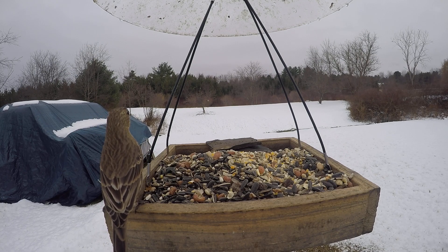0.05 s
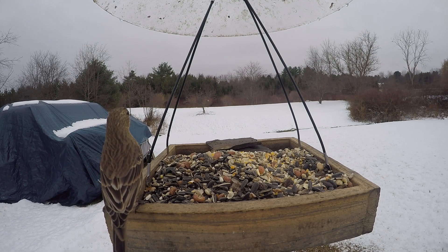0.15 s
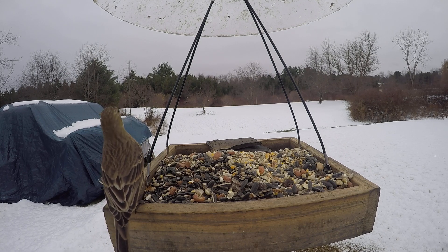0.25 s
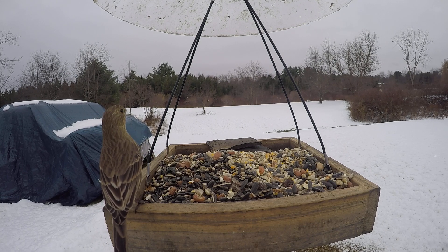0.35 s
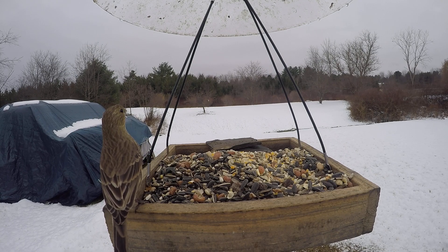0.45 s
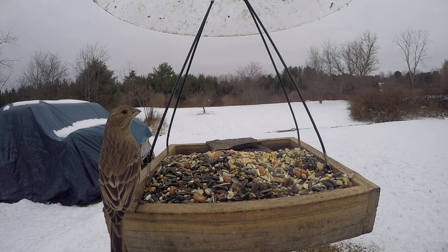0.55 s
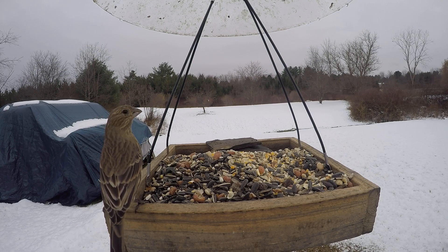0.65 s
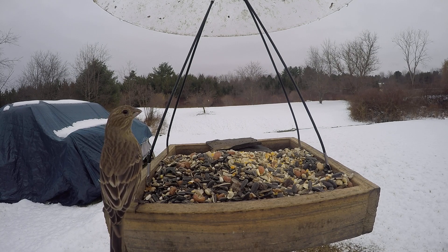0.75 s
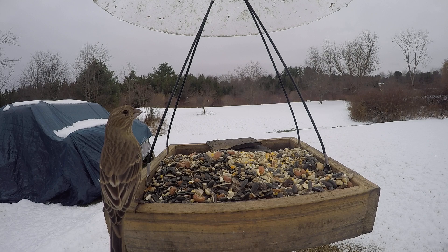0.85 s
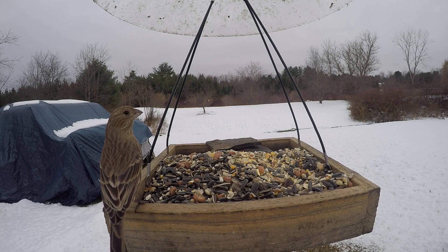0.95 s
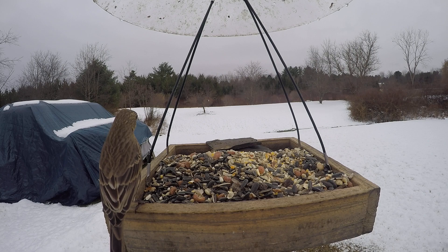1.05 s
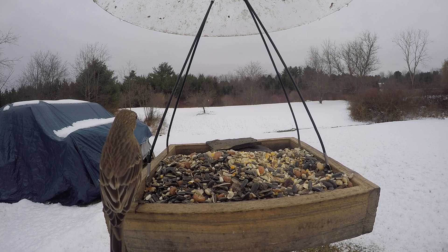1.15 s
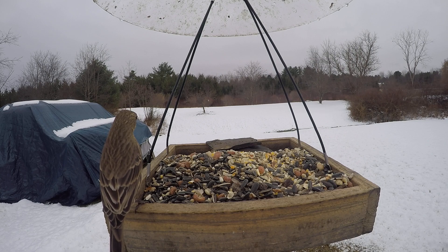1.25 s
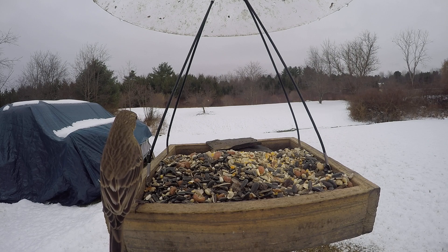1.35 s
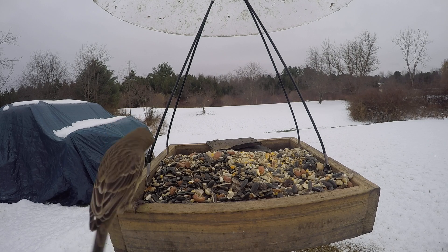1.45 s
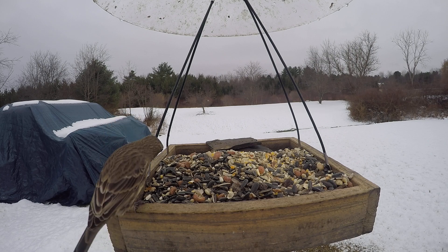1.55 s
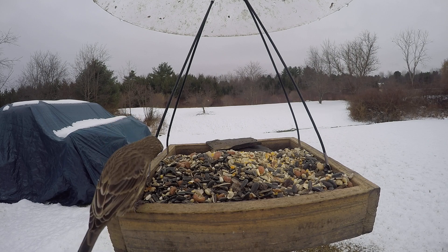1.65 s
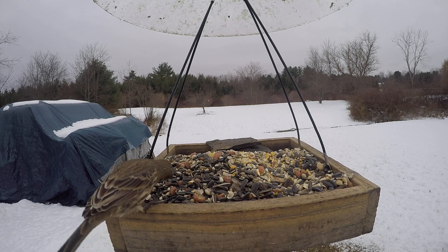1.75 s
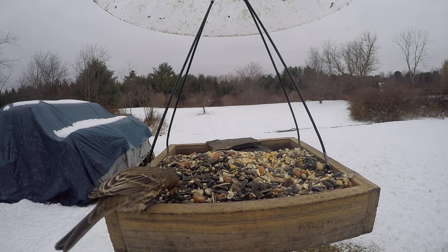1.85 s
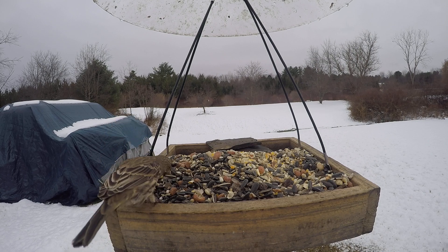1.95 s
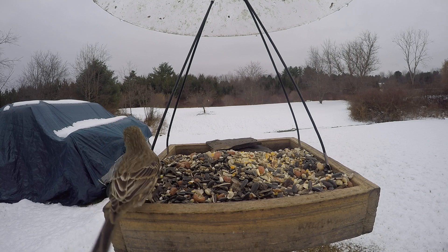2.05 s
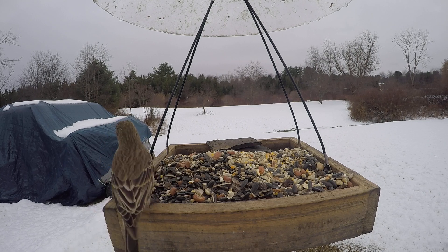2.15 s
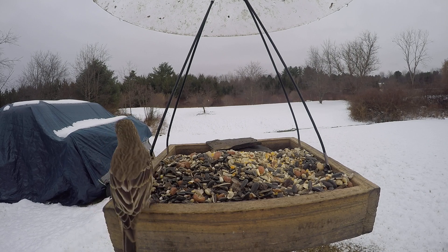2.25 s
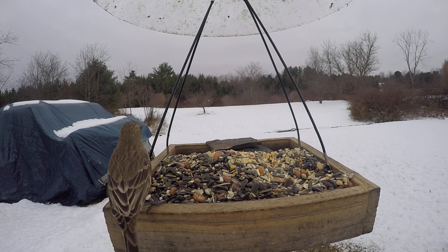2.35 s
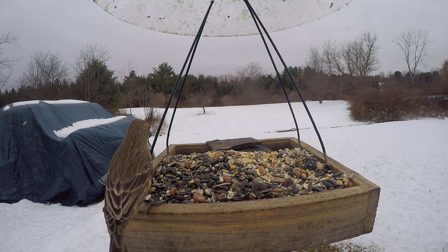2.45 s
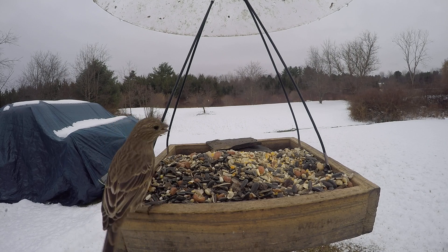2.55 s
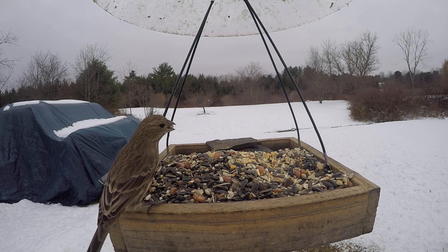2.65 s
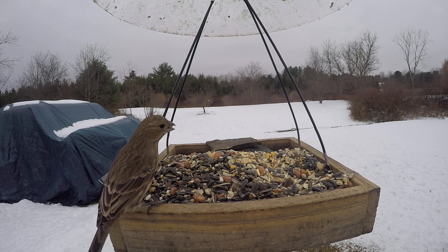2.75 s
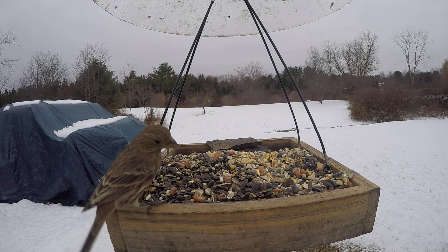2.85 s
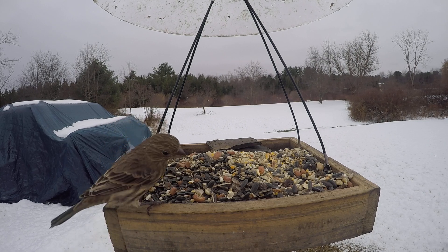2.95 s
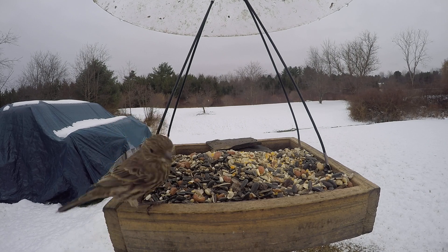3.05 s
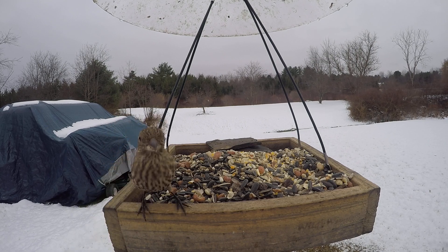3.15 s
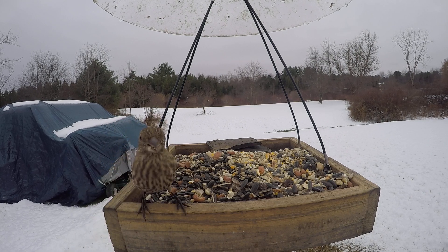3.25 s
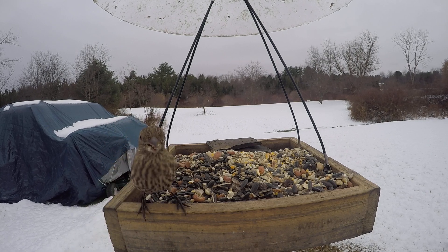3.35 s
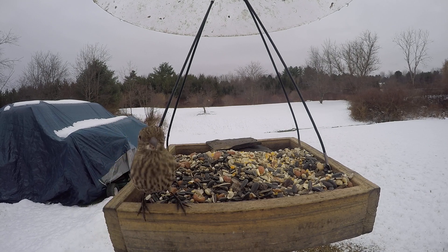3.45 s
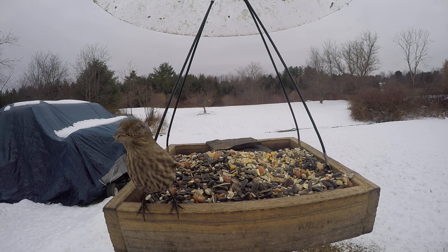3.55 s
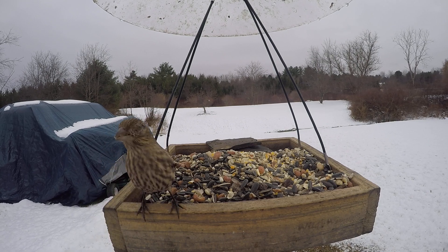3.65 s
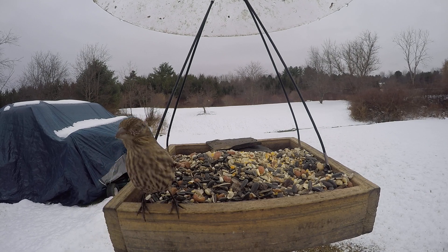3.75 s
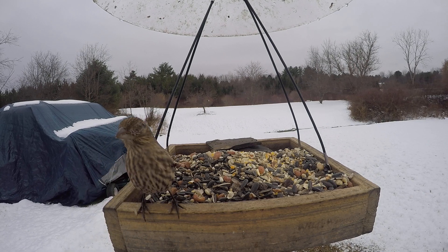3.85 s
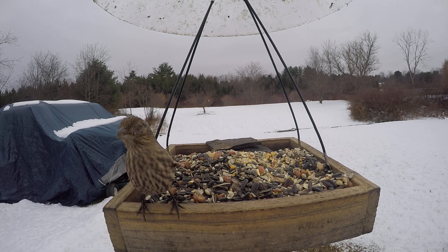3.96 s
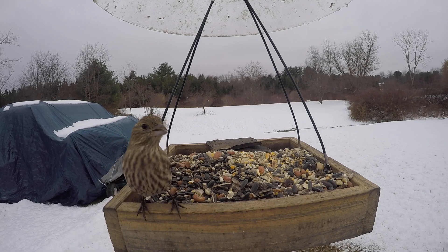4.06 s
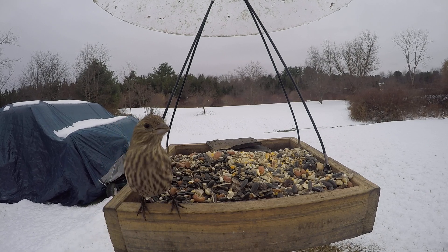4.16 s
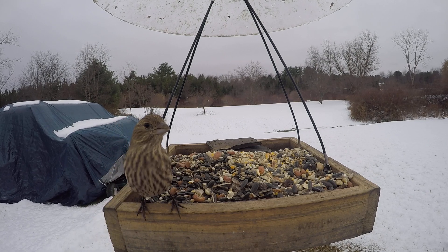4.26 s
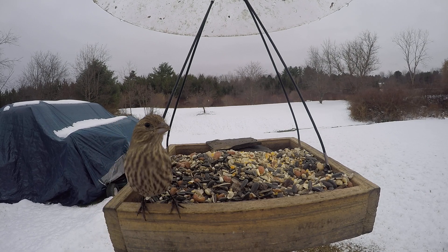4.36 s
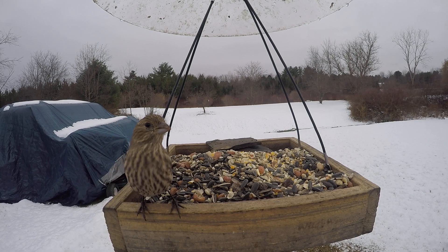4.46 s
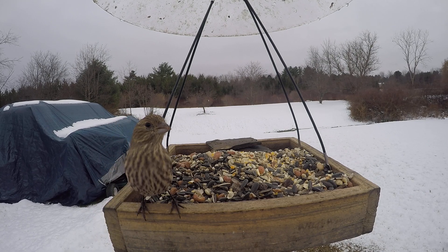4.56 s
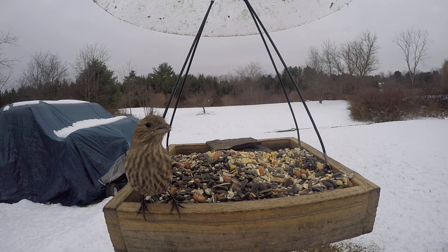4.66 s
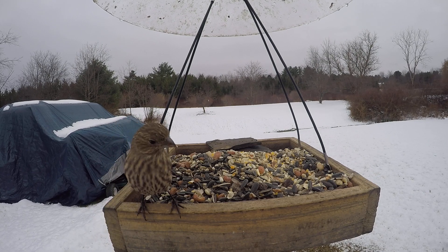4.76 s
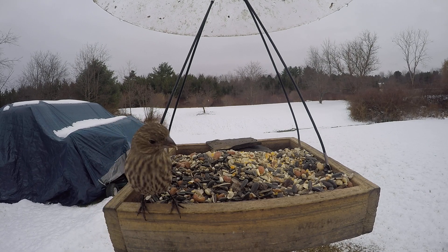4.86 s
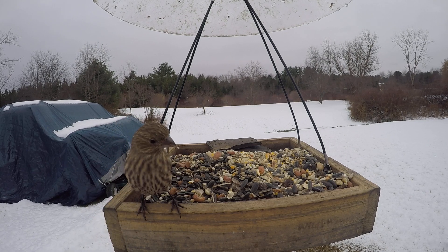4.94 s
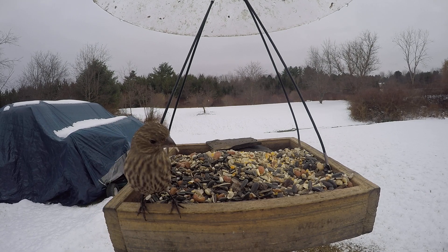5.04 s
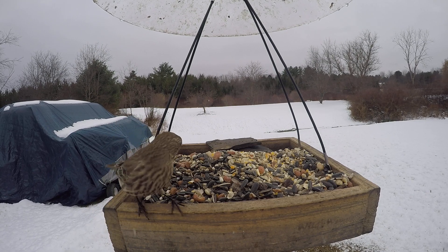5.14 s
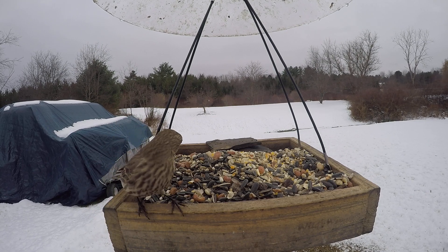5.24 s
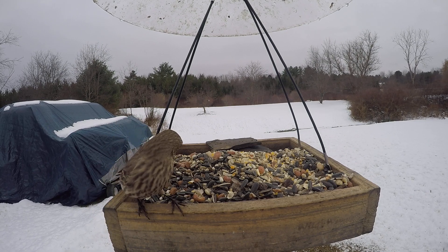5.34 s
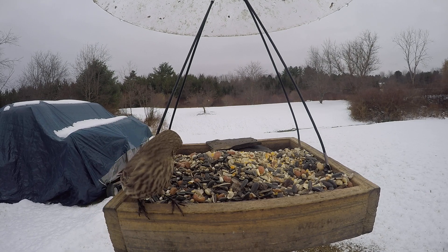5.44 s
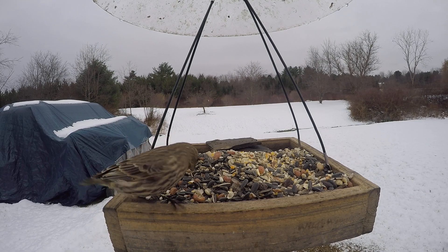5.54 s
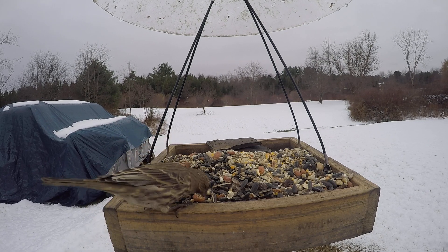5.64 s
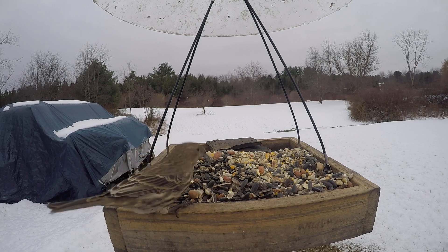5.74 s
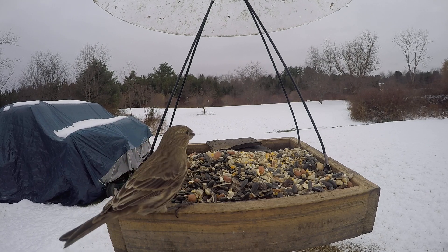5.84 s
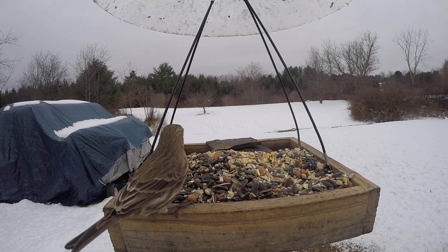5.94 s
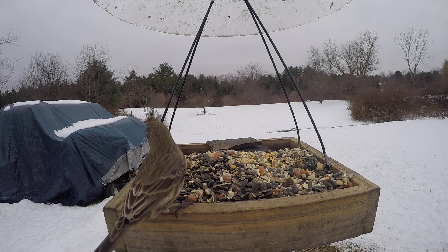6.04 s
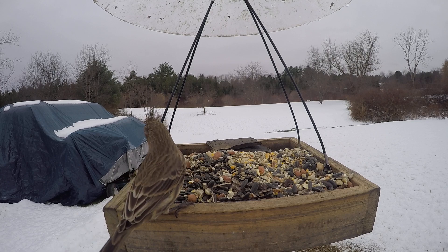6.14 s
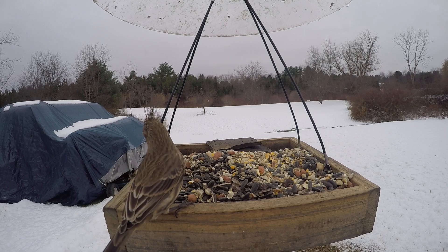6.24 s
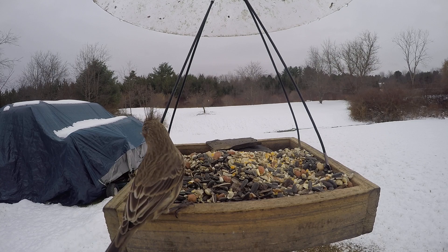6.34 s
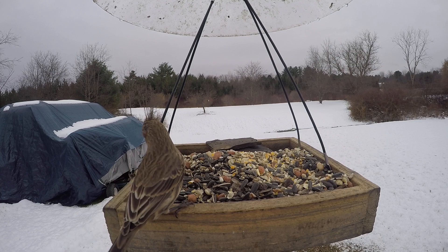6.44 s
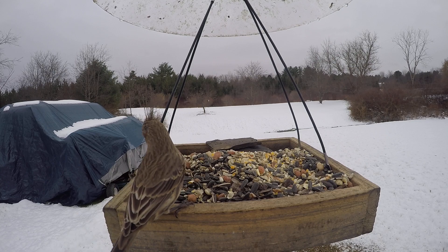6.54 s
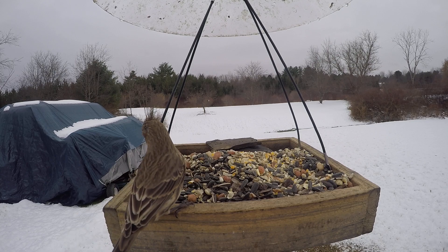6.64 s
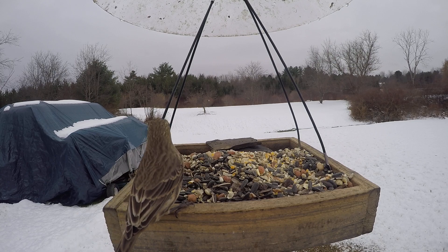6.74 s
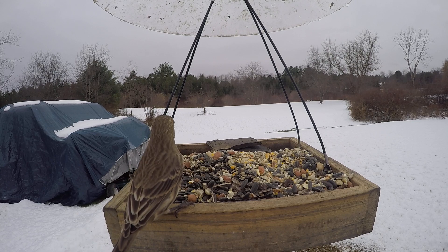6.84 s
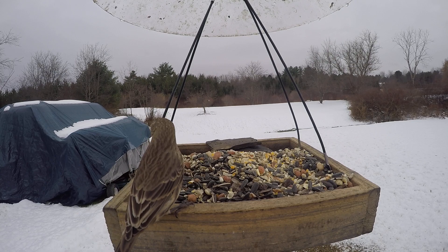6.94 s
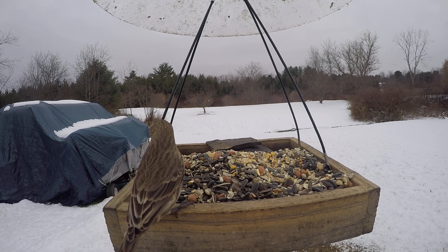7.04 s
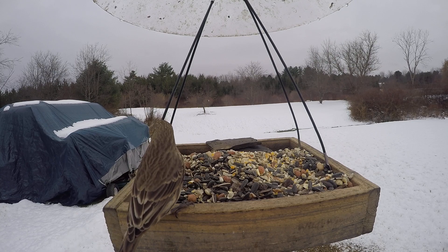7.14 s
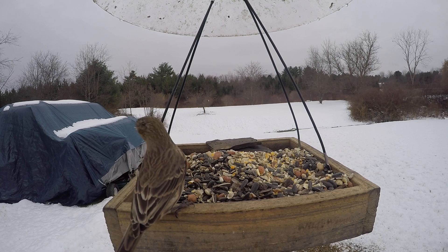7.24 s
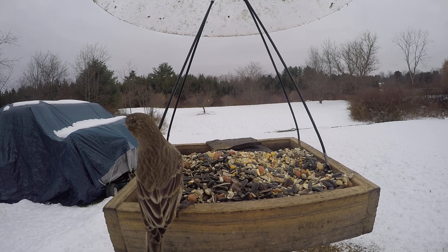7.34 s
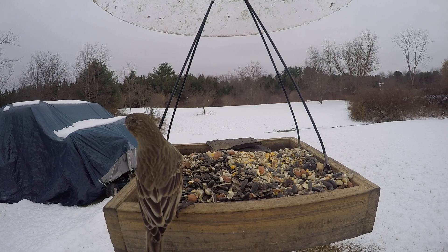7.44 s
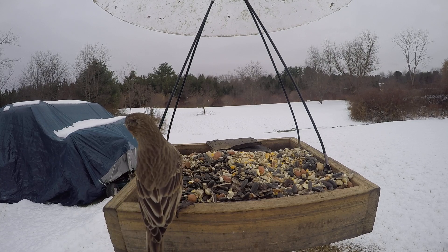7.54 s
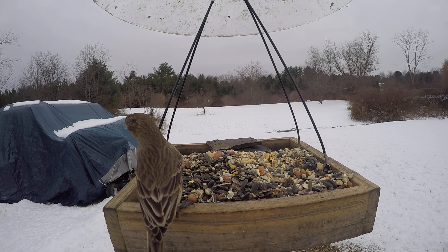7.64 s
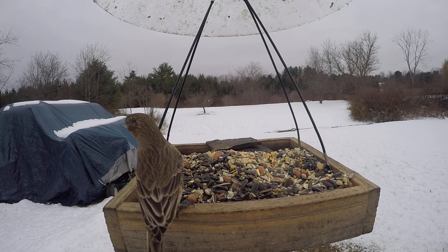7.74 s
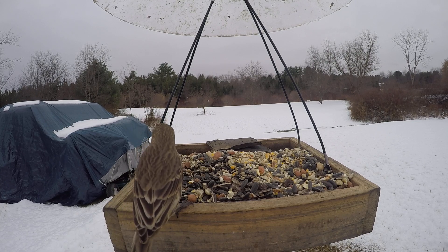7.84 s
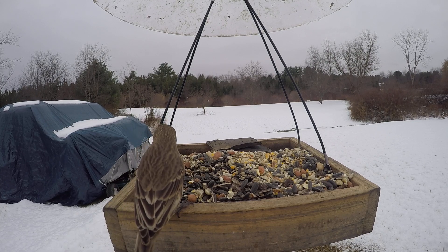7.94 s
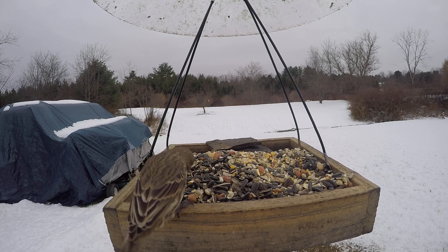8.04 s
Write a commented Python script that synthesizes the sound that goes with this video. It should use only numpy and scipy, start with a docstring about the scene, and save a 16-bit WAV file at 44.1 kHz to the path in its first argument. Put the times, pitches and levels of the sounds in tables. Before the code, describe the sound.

A soft low rumble and faint hiss of still outdoor air continue throughout. A small bird moves in a hanging wooden seed tray right at the microphone, dry and without echo. Light ticks open the scene, with three very faint, thin distant chirps around 1 second. From about 1.7 to 3.3 seconds the bird hops and pecks busily: quick hollow knocks, claw clicks, seed rustles and soft low thumps, strongest near 2 and 3.2 seconds, where the tray gives a deep, fading shudder. Another knock comes at 3.6 seconds, followed by sparse light taps and shuffles. A second flurry runs from about 5.2 to 6 seconds, peaking near 5.7 with a sharp knock, thumps and another shudder. Tiny husk snaps occur near 2.4, 5.6 and 6.4 seconds. Separate taps follow around 6.7, 7.4 and 8 seconds.

```python
"""Finch in a wooden seed tray

A finch hops about and pecks in a hanging seed tray with the microphone fixed to it, on a still winter day.
Claws and beak tick on the wood and stir the seed: bursts of tiny slips set decaying tones of the tray ringing.
Hops thump the tray as low fading tones, and a deep wavering tone is the tray shuddering on its cords.
Husks snap as short bright noise. Gliding whistles make thin far chirps, and shaped noise makes the faint hiss."""
import sys
import numpy as np
from scipy import signal
from scipy.fft import rfft, irfft
from scipy.io import wavfile
from scipy.ndimage import uniform_filter1d

SR = 44100
rng = np.random.default_rng(int(sys.argv[2]) if len(sys.argv) > 2 else 0)


def wrap_up_sound(samples):
    """Save the sound to the file named by the first command line argument, as 16-bit audio."""
    columns = np.atleast_2d(samples).T
    # keep every value between -1 and 1, then stretch to whole-number steps
    tamed = np.clip(columns, -1, 1)
    steps = np.round(tamed * 32767).astype(np.int16)
    wavfile.write(sys.argv[1], SR, steps)


N = 357033
TIME = np.arange(N) / SR  # seconds

# Still air and microphone hiss. Each row: pitch in Hz, density in dB per Hz against the other rows.
AIR_SPECTRUM = [(40, -20.5), (70, -21.5), (110, -30), (190, -35), (330, -39), (600, -41.5), (880, -42),
                (1200, -47), (2500, -48), (4800, -48), (6200, -52.5), (9000, -55), (13000, -57.5),
                (15500, -62.5)]
# Far chirps. Each row: start in seconds, length in seconds, first pitch in Hz, last pitch in Hz,
# level in dB before the trill, trill depth from 0 to 1.
FAR_CHIRPS = [(.76, .09, 8500, 7340, -72, 0.8), (1.05, 0.094, 7750, 7600, -75, .15),
              (1.07, .065, 3600, 2800, -72, .1)]
# Each shift of the bird's weight sets the tray swinging anew, or checks it.
# Each row: time in seconds, shudder level in dB, before the smoothing.
WEIGHT_SHIFTS = [(0, -47.5), (.36, -40.5), (.64, -41.5), (1.08, -36.5), (1.8, -40), (1.961, -23.5),
                 (2.5, -40.5), (2.93, -40), (3.22, -24.5), (5.18, -43.5), (5.47, -41.5), (5.68, -26.5),
                 (6.72, -50.5), (6.92, -36.5), (7.39, -34.5), (7.87, -50), (8.02, -40.5)]
# The bird's weight comes down. Each row: time in seconds, tray bounce in dB, floor board in dB,
# both before the offset of each tone.
LANDINGS = [(1.804, -35, -29.5), (1.933, -27, -34), (1.959, -35, -42), (2.164, -33.5, -30),
            (2.439, -41, -32.5), (2.657, -56.5, -52), (2.957, -44.5, -44), (3.051, -33.5, -44),
            (3.143, -36, -40.5), (3.175, -32.5, -41.5), (3.206, -30.5, -34.5), (3.627, -45, -44),
            (5.625, -33, -46), (5.659, -38.5, -28), (5.759, -34, -39.5), (5.86, -39, -45),
            (6.733, -38, -52), (7.378, -40.5, -37.5)]
# Seed husks crack in the beak. Each row: time in seconds, level in dB.
HUSK_CRACKS = [(2.398, -63), (5.642, -61), (6.433, -64.5)]
# Ringing tones (modes) of the tray. Each row: pitch in Hz, width in Hz (wider dies sooner),
# relative level in dB before it is multiplied by the width.
TRAY_MODES = [(322, 47, -2.5), (535, 26, -27.5), (570.5, 72, -12.5), (719, 46, -14), (813, 33, -18.5),
              (879, 66, 2), (923, 63, 7), (962, 37, -8.5), (1218, 163, -11), (1233, 180, -19.5),
              (1344, 67, -19.5), (1668, 73, -15.5), (1820, 79, -22), (1955, 28, -20), (2060, 135, -23),
              (2240, 28, -26), (2431, 60, -15), (2883, 42, -24), (2967, 115, -14.5), (3154, 120, -18),
              (3420, 140, -16), (3780, 89, -26.5), (3830, 81, -37), (4390, 155, -20.5), (4960, 136, -25),
              (5540, 154, -19.5), (5900, 80, -31.5), (6090, 160, -30), (6900, 290, -40)]
# Edges in Hz of the tray's four registers: hollow body, wood knock, hard clack, seed scratch.
REGISTER_EDGES = [460, 750, 1120, 2900, 7000]
# The feet shuffle in the seed. Each row: start in seconds, length in seconds,
# level in dB before the offset of the rolling seeds or of the toe taps.
FOOT_SHUFFLES = [(0.308, 0.16, -67), (1.421, 0.17, -64.5), (1.724, 0.16, -56.5), (1.949, 0.052, -35),
                 (2.022, .28, -58), (2.34, 0.13, -61), (2.597, 0.095, -59.5), (2.934, 0.31, -58),
                 (3.572, 0.11, -55), (4.107, 0.02, -53), (4.767, 0.06, -64.5), (5.167, 0.085, -50),
                 (5.363, 0.073, -68.5), (5.589, 0.19, -51), (5.78, 0.33, -65.5), (7.328, 0.05, -58.5),
                 (7.851, 0.047, -59)]
# Firm touches of claws and beak. Each row: time in seconds, wood knock in dB, hard clack in dB,
# seed scratch in dB.
FIRM_TOUCHES = [(.3276, -56, -72.5, -79), (.62, -59.5, -62, -79), (1.1866, -61, -58, -77),
                (1.456, -70, -60, -79), (1.534, -54, -61, -71), (1.7131, -48.5, -60.5, -66),
                (1.752, -56.5, -59.5, -68), (1.7829, -44, -52.5, -54.5), (1.798, -30, -35.5, -54),
                (1.8304, -38.5, -48, -61), (1.8886, -40.5, -53, -54), (1.9149, -34, -46, -53),
                (1.954, -34.5, -45, -46.5), (1.9605, -23.5, -34, -45.5), (1.972, -43, -41, -51),
                (1.987, -33, -42.5, -48.5), (1.9972, -32, -49, -55), (2.007, -37, -46, -59.5),
                (2.1304, -37.5, -57, -61), (2.1384, -41, -50.5, -51.5), (2.154, -54, -59, -66),
                (2.1634, -23, -36, -46), (2.186, -67, -60, -61), (2.1978, -40, -55, -67),
                (2.2299, -53, -64, -78), (2.2494, -60, -60, -74), (2.4212, -58, -53, -58.5),
                (2.4406, -30.5, -40, -55), (2.6574, -47, -58, -63), (2.6727, -54, -67, -80),
                (2.955, -50.5, -56, -61), (2.9748, -48.5, -65, -65), (2.9986, -56, -50, -57.5),
                (3.0274, -34.5, -48, -45.5), (3.0499, -60, -61, -60), (3.1194, -47, -49.5, -55.5),
                (3.1439, -41, -51.5, -55.5), (3.1591, -45, -58.5, -57.5), (3.1846, -38, -51, -50.5),
                (3.1996, -24.5, -38.5, -47), (3.209, -42, -51, -51.5), (3.564, -52, -73, -79),
                (3.6, -47.5, -61, -77), (3.6278, -33, -44.5, -64), (3.649, -49.5, -73, -76),
                (3.7586, -54.5, -67.5, -72), (3.864, -64.5, -74, -79), (4.1139, -51.5, -68, -75),
                (4.1403, -50.5, -73, -84), (4.8098, -51, -66.5, -88), (4.841, -52.5, -67, -76),
                (5.176, -51, -61.5, -68), (5.1876, -59, -58.5, -72), (5.203, -45, -56.5, -69),
                (5.2096, -54, -67, -73), (5.2345, -43.5, -54.5, -61), (5.2924, -50, -64, -76),
                (5.4066, -60, -69, -72), (5.6205, -43.5, -47.5, -45.5), (5.642, -39.5, -58, -57),
                (5.658, -24.5, -30.5, -46.5), (5.6913, -45.5, -52, -66), (5.729, -49, -50.5, -66),
                (5.7402, -41, -55, -62.5), (5.752, -55, -59.5, -64), (5.827, -51.5, -64.5, -79),
                (5.8802, -48, -59.5, -68), (5.9213, -59.5, -72, -79), (6.0225, -50.5, -69.5, -77),
                (6.2015, -52, -74, -79), (6.7326, -47, -62, -70), (7.083, -64, -82.5, -80),
                (7.2906, -58, -73, -77.5), (7.357, -52, -60, -67.5), (7.3768, -36, -41.5, -52.5),
                (7.3851, -43.5, -54.5, -73.5), (7.8708, -53.5, -64, -70), (7.9085, -53.5, -78, -78),
                (7.956, -42.5, -50, -63.5), (8.077, -61, -75, -83)]
# The duller second foot against the first. The values: knock in dB, clack in dB, scratch in dB.
SECOND_FOOT_OFFSETS = (-7, -11, -2)
# A graze against the scratch of its touch. The values: knock in dB, clack in dB, scratch in dB.
GRAZE_OFFSETS = (-2.8, -12, -19)

AIR_DB = -59.5
SHUDDER_HZ = 27.6  # the middle of its slow wander
SHUDDER_SMOOTHING_S, SHUDDER_FALL_DB_PER_S = .085, 15.5
# the hollow body of the tray sounds under every knock
BODY_DB = -12
# in a heavy landing (knock above this level) the second foot follows the first
LANDING_ABOVE_DB, SECOND_FOOT_S = -33.5, .0048
# a claw that digs into the seed (scratch above this level) grazes it twice more as it slides on
DIGGING_ABOVE_DB, GRAZE_S = -60.5, .007
# light toe taps: rate, level against the shuffle, ceiling of the knock before the random spread, spread
TAPS_PER_S, TAP_DB, TAP_MAX_DB, TAP_SPREAD_DB = 28, 0.5, -55, 2
# clack and scratch of a light tap against its knock
TAP_CLACK_DB, TAP_SCRATCH_DB = -8.5, -17.5
CUTOFF_HZ = 15250


def from_db(db):
    """Turn decibels into a gain."""
    return 10 ** (np.asarray(db) / 20)


def rms_one(x):
    """Scale a sound to rms (average strength) 1."""
    return x / np.sqrt(np.mean(x ** 2) + 1e-20)


def add(track, s, sound):
    """Mix a sound into the track from time s in seconds."""
    at = max(round(s * SR), 0)
    track[at:at + len(sound)] += sound[:max(N - at, 0)]


def at_level(sound, db):
    """Give a short sound the energy of 10 ms at this rms level."""
    energy = np.sum(sound ** 2)
    return from_db(db) * sound / np.sqrt(energy / (SR / 100) + 1e-20)


def bandpass(order, low_hz, high_hz):
    """Make a filter that keeps what lies between two pitches."""
    return signal.butter(order, [low_hz, high_hz], "band", fs=SR, output="sos")


def drift(rate_hz):
    """Wander smoothly by chance with rms 1, by smoothing noise twice."""
    r = np.exp(-2 * np.pi * rate_hz / SR)
    noise = rng.standard_normal(N + SR)
    smooth = signal.lfilter([1], [1, -2 * r, r * r], noise)
    return rms_one(smooth[SR:])  # leave out the first second, while the filter settles


def random_slips(count, grains_per_s):
    """Scatter single clicks of random strength in time, as grains that slip."""
    return (rng.random(count) < grains_per_s / SR) * rng.standard_normal(count)


def scuff(t, length_s, grains_per_s, grain_size):
    """Let tiny slips swell and die around one firm touch."""
    slips = random_slips(len(t), grains_per_s)
    swell = t / length_s * np.exp(1 - t / length_s)
    force = grain_size * slips * swell
    firm_at = min(int(.6 * length_s * SR), len(t) - 1)
    force[firm_at] += 1
    return force


def tray_modes(t, spread_db=3.5, detune=0.0085):
    """Ring each mode after one click; each spot favours other modes and the bird's weight shifts them."""
    hz, width, db = np.transpose(TRAY_MODES)
    strength = width * from_db(db + spread_db * rng.standard_normal(len(hz)))
    # the lowest modes move together, the higher ones in turn with and against each other
    side = np.where(hz < REGISTER_EDGES[2], 1, (-1) ** np.arange(len(hz)))
    pitch = hz * (1 + detune * rng.standard_normal(len(hz)))
    decay = np.exp(-np.pi * width[:, None] * t)
    return (side * strength)[:, None] * decay * np.sin(2 * np.pi * pitch[:, None] * t)


def air():
    """Shape noise into an even hiss over a soft outdoor rumble."""
    points_hz, points_db = np.transpose(AIR_SPECTRUM)
    hz = np.maximum(np.fft.rfftfreq(N, 1 / SR), 1)
    gain = from_db(np.interp(np.log(hz), np.log(points_hz), points_db))
    gain = gain * (hz > 25)
    noise = irfft(rfft(rng.standard_normal(N)) * gain, N)
    return from_db(AIR_DB) * rms_one(noise)


def chirps(trill_hz=70, swing_hz=650):
    """Whistle thin falling tones, pulsed in level and pitch."""
    out = np.zeros(N)
    for s, length, start_hz, end_hz, db, depth in FAR_CHIRPS:
        t = np.arange(int(length * SR)) / SR
        trill = depth * np.sin(2 * np.pi * trill_hz * t)
        # the trill depth also scales the pitch swing
        hz = start_hz + (end_hz - start_hz) * t / length + swing_hz * trill
        whistle = np.sin(2 * np.pi * np.cumsum(hz) / SR)
        swell = np.sin(np.pi * t / length)
        add(out, s, from_db(db) * swell * (1 + trill) * whistle)
    return out


def shudder(wander_hz=0.281, overtone_db=-42):
    """Quiver on the cords as one deep, nearly pure tone that dies away after each shift of weight."""
    s, db = np.transpose(WEIGHT_SHIFTS)
    last = np.maximum(np.searchsorted(s, TIME, side="right") - 1, 0)
    level = from_db(db[last] - SHUDDER_FALL_DB_PER_S * (TIME - s[last]))
    level = uniform_filter1d(level, max(int(SHUDDER_SMOOTHING_S * SR), 1))
    hz = SHUDDER_HZ + wander_hz * drift(0.793)
    phase = 2 * np.pi * np.cumsum(hz) / SR
    tone = np.sin(phase) + from_db(overtone_db) * np.sin(3 * phase)
    return np.sqrt(2) * level * tone  # a sine of rms 1 has a peak of root 2


def thud(hz, t60, rise_s):
    """Push a low mode softly with the feet; its outline peaks at 1 and its fade is 60 dB in t60 seconds."""
    t = np.arange(SR // 2) / SR
    rise = 1 - np.exp(-(t / rise_s) ** 2)
    shape = rise * from_db(-60 * t / t60)
    return shape / shape.max() * np.sin(2 * np.pi * hz * t)


def hops(bounce_db=-1.0, board_db=-3.5, sag_db=-4, frame_db=-16, overtone_db=-26, detune=0.068):
    """Bounce the whole tray and flex its floor board, at a pitch that depends on where the bird stands."""
    out = np.zeros(N)
    for s, bounce, board in LANDINGS:
        load = 1 + detune * rng.standard_normal()  # where the bird stands, by chance
        add(out, s, from_db(bounce + sag_db) * thud(hz=47 * load, t60=0.13, rise_s=0.014))
        add(out, s, from_db(bounce + bounce_db) * thud(hz=80 * load, t60=0.2, rise_s=0.0067))
        add(out, s, from_db(bounce + frame_db) * thud(hz=133 * load, t60=0.32, rise_s=0.00325))
        add(out, s, from_db(board + board_db) * thud(hz=181 * load, t60=0.077, rise_s=0.023))
        add(out, s, from_db(board + overtone_db) * thud(hz=335 * load, t60=0.065, rise_s=0.00316))
    return out


def husks(low_hz=3500, high_hz=9000, length_s=0.00082):
    """Split a husk with a tiny bright snap: a very short scuff with only its treble kept."""
    out, t = np.zeros(N), np.arange(SR // 50) / SR
    bright = bandpass(2, low_hz, high_hz)
    for s, db in HUSK_CRACKS:
        crack = scuff(t, length_s, grains_per_s=7600, grain_size=0.69)
        add(out, s, at_level(signal.sosfilt(bright, crack), db))
    return out


def shuffles(grains_per_s=1500, clump_db=5.0, low_hz=740, dull_hz=1350, level_db=-5.0):
    """Roll seeds under the toes: clumps of faint, soft clicks into the same wood."""
    out, clumps = np.zeros(N), from_db(clump_db * drift(59.0))
    dull = bandpass(2, low_hz, dull_hz)
    for s, length, db in FOOT_SHUFFLES:
        t = np.arange(int(length * SR)) / SR
        grains = random_slips(len(t), grains_per_s)
        swell = np.abs(np.sin(np.pi * t / length)) ** .5
        force = grains * np.interp(s + t, TIME, clumps) * swell
        ring = tray_modes(TIME[:SR // 20]).sum(axis=0)
        sound = signal.fftconvolve(force, ring)
        add(out, s, from_db(db + level_db) * rms_one(signal.sosfilt(dull, sound)))
    return out


def toe_taps():
    """Tap lightly by chance while the feet shuffle, about evenly spread, as rows like the firm touches."""
    rows = []
    for start, length, db in FOOT_SHUFFLES:
        count = int(length * TAPS_PER_S)
        times = start + length * (np.arange(count) + rng.random(count)) / max(count, 1)
        levels = min(db + TAP_DB, TAP_MAX_DB) + np.array([0, TAP_CLACK_DB, TAP_SCRATCH_DB])
        for s in times:
            rows.append((s, *(levels + TAP_SPREAD_DB * rng.standard_normal(size=3))))
    return rows


def touches():
    """List firm touches, the second feet and grazes that follow them, and toe taps, in the same columns."""
    rows = list(FIRM_TOUCHES)
    for s, knock, clack, scratch in FIRM_TOUCHES:
        if knock > LANDING_ABOVE_DB:
            second = np.array([knock, clack, scratch]) + np.array(SECOND_FOOT_OFFSETS)
            rows.append((s + SECOND_FOOT_S, *second))
        if scratch > DIGGING_ABOVE_DB:
            for k in (1, 2):
                later_s = k * GRAZE_S * rng.uniform(.8, 1.2)
                rows.append((s + later_s, *(scratch + np.array(GRAZE_OFFSETS))))
    return rows + toe_taps()


def contacts(firm_s=.0012, soft_s=.0022, rattle_db=-40, rattle_s=0.011, lead_s=.0016,
             gritty=0.87, smooth=0.34, sizzle_db=-24):
    """Ring the tray at every touch; its place and hardness share the energy among four registers."""
    out, t = np.zeros(N), np.arange(SR // 14) / SR
    bands = [bandpass(3, low, high) for low, high in zip(REGISTER_EDGES, REGISTER_EDGES[1:])]
    top = bandpass(2, 7500, 12500)
    register = np.digitize(np.array(TRAY_MODES)[:, 0], REGISTER_EDGES[1:-1])
    for s, knock_db, clack_db, scratch_db in touches():
        # hard blows are over quickly, light touches slide
        length = np.interp(clack_db, [-70, -46], [soft_s, firm_s])
        # loose seed goes on settling after the touch
        settling = from_db(rattle_db) * scuff(t, rattle_s, grains_per_s=2200, grain_size=0.36)
        # low modes feel the whole push, high ones every grain that slips
        push = scuff(t, length, grains_per_s=4000, grain_size=smooth) + settling
        scrape = scuff(t, length, grains_per_s=5600, grain_size=gritty) + settling
        forces = (push, push, push + scrape, scrape)
        levels = (knock_db + BODY_DB, knock_db, clack_db, scratch_db)
        modes = tray_modes(t)
        for k, (force, db) in enumerate(zip(forces, levels)):
            ring = modes[register == k].sum(axis=0)
            sound = signal.fftconvolve(force, ring)[:len(t)]
            # start a little early, as the firm touch comes partway into the scuff
            add(out, s - lead_s, at_level(signal.sosfilt(bands[k], sound), db))
        # dry husks rubbing together add a faint sizzle on top
        rubbing = scuff(t, length_s=0.0013, grains_per_s=4500, grain_size=1.63)
        add(out, s, at_level(signal.sosfilt(top, rubbing), scratch_db + sizzle_db))
    return out


def scene():
    """Add up all the sounds at one microphone, with no echo."""
    background = air() + chirps()
    tray = shudder() + hops()
    bird = husks() + shuffles() + contacts()
    return (background + tray + bird)[None]


def record(dry):
    """Cut the top steeply above the cutoff."""
    steep = signal.ellip(10, .1, 90, CUTOFF_HZ, fs=SR, output="sos")
    return signal.sosfilt(steep, dry)


dry = scene()
out = record(dry)
wrap_up_sound(out)
```